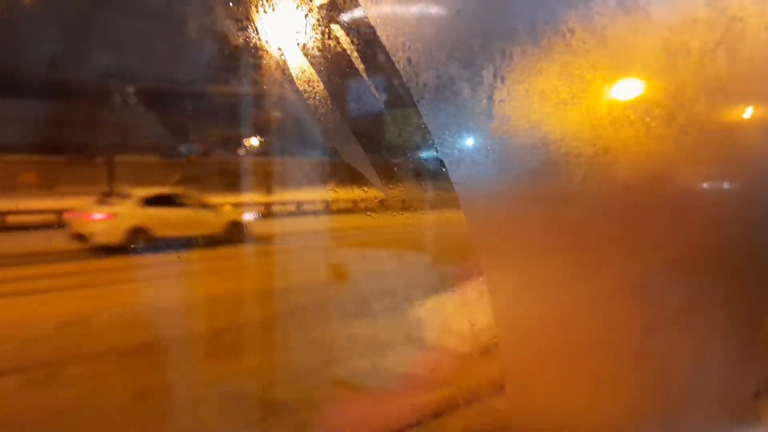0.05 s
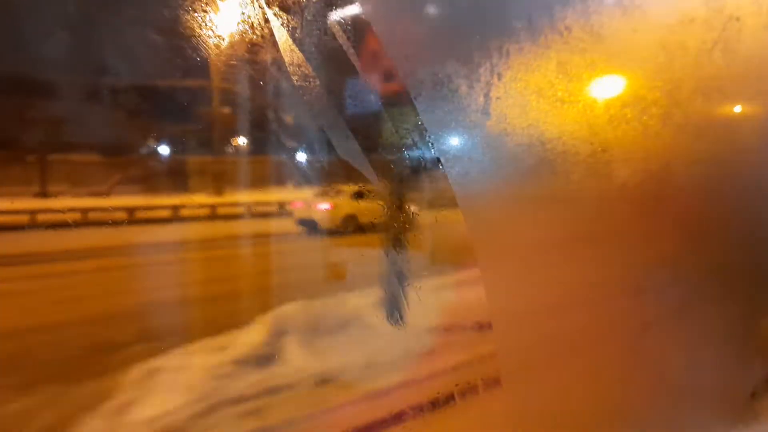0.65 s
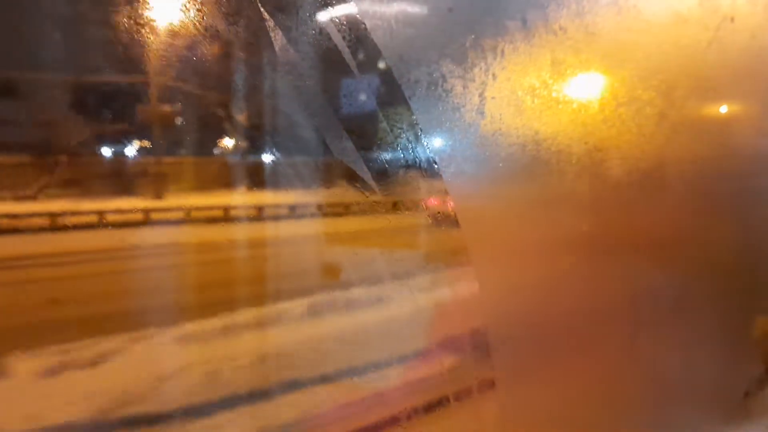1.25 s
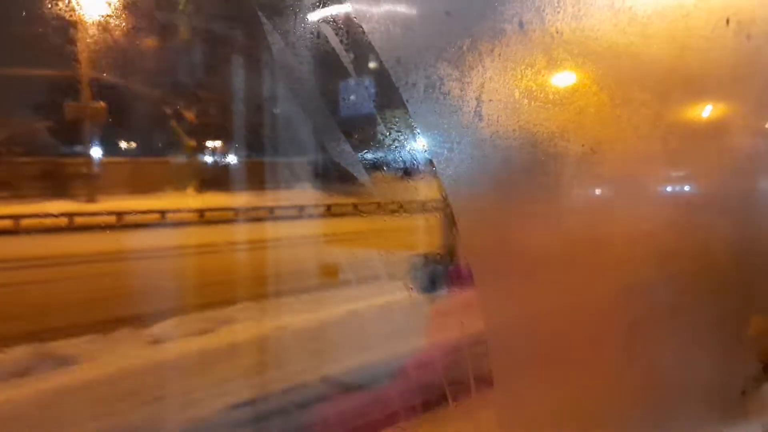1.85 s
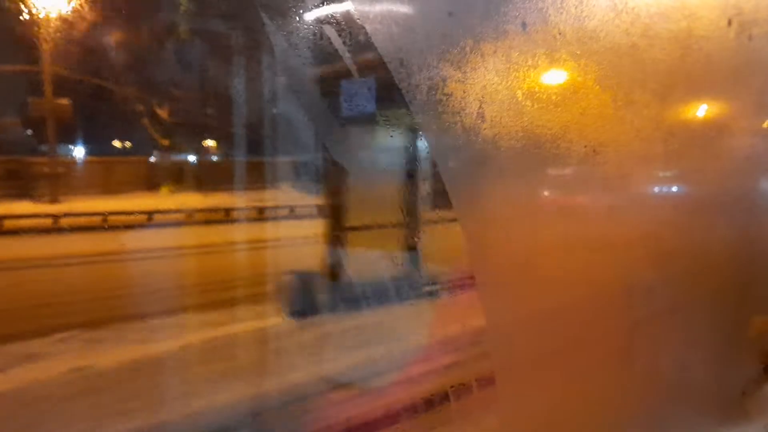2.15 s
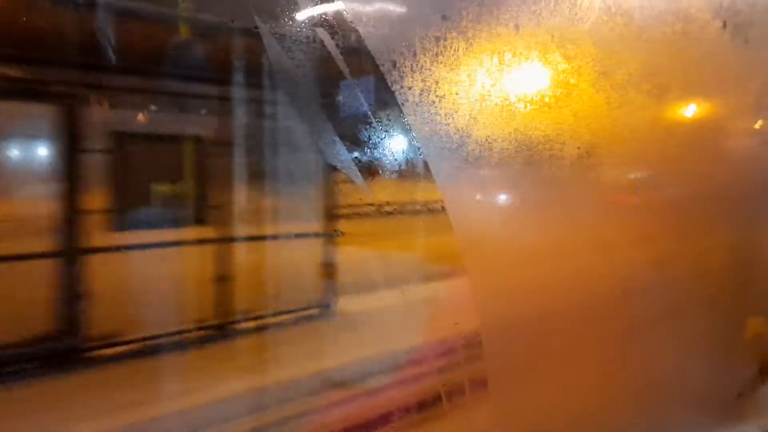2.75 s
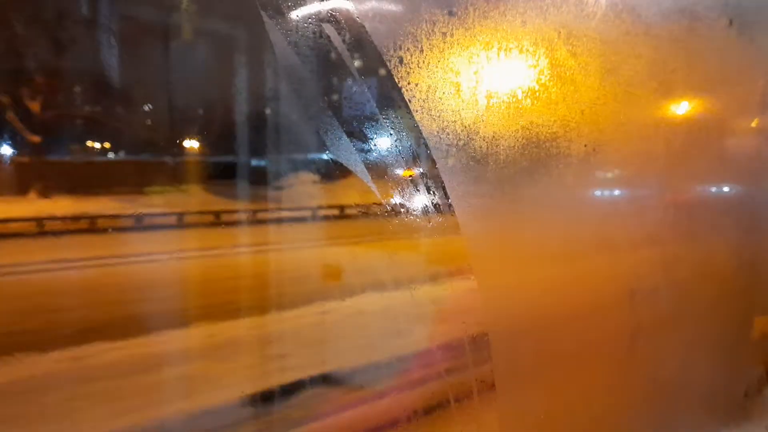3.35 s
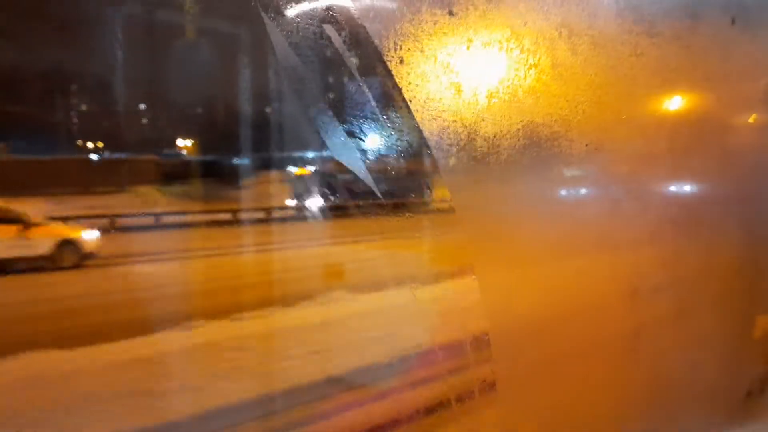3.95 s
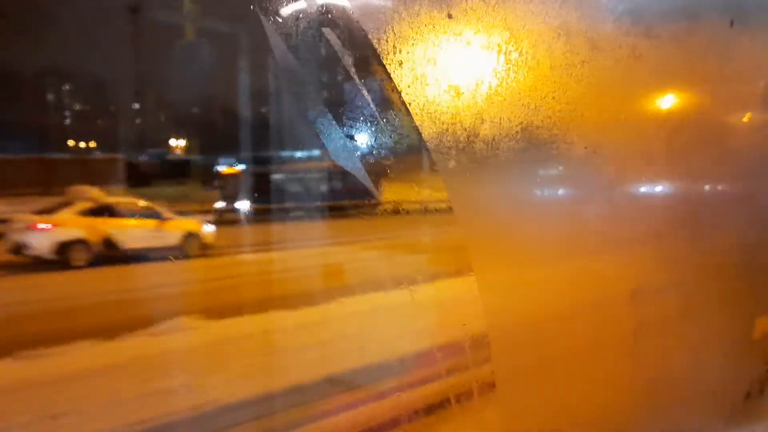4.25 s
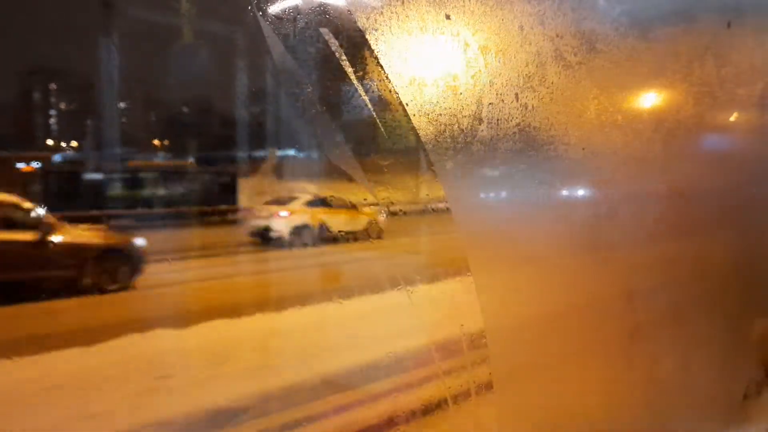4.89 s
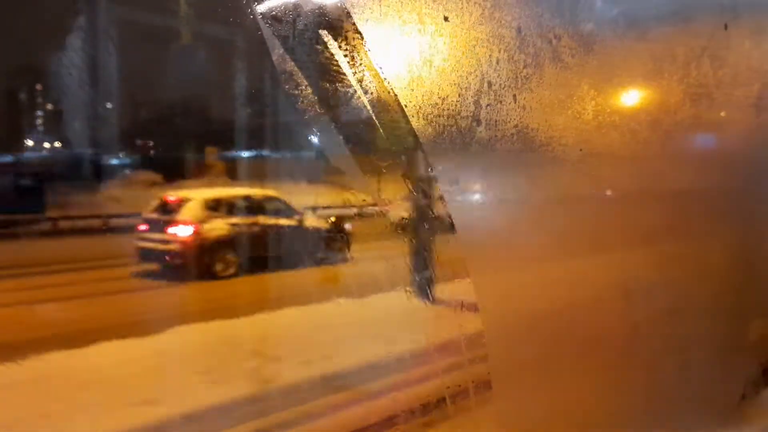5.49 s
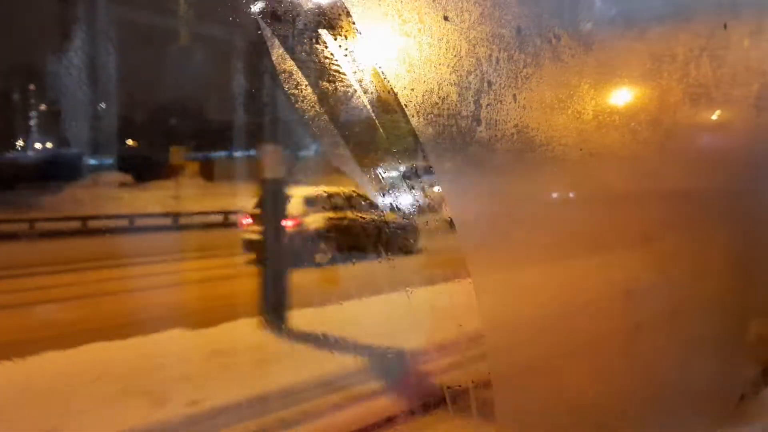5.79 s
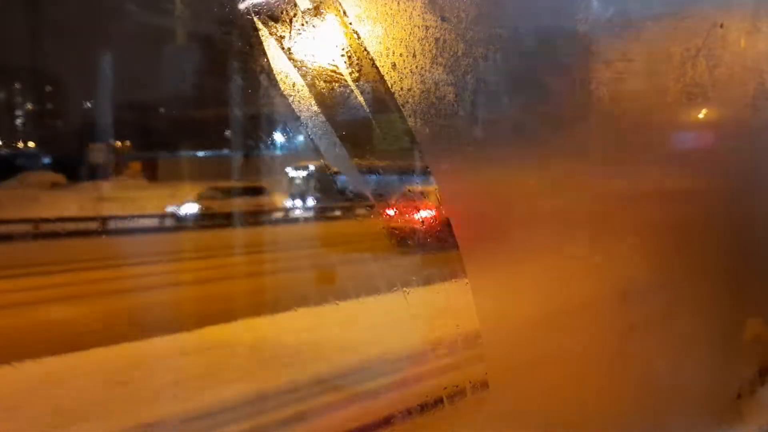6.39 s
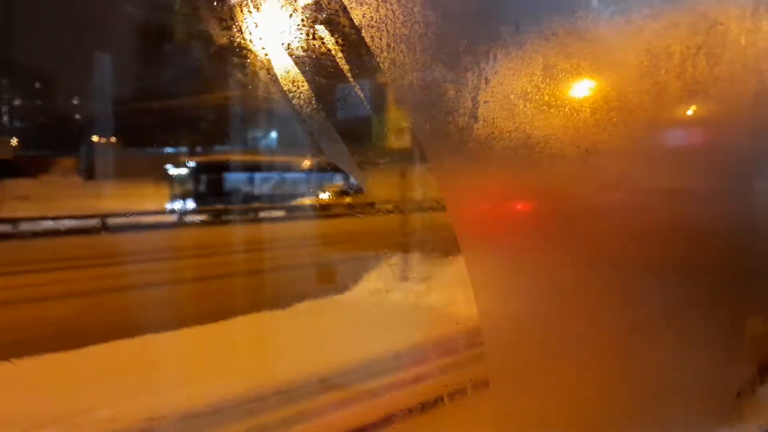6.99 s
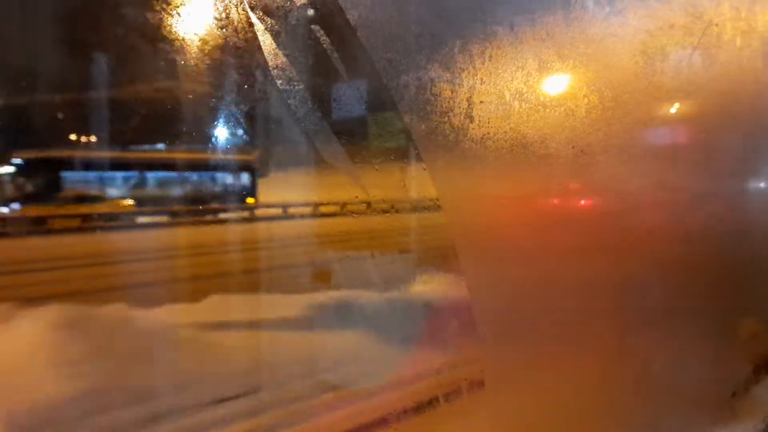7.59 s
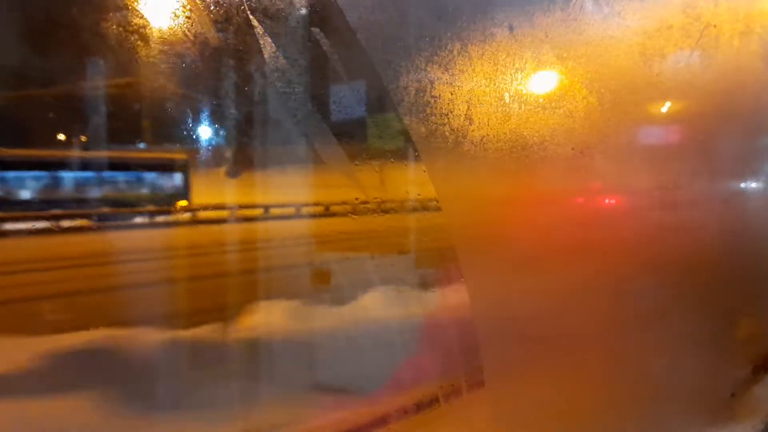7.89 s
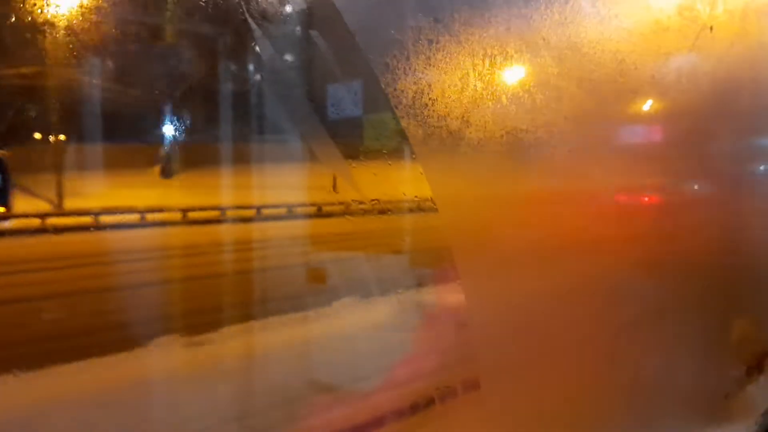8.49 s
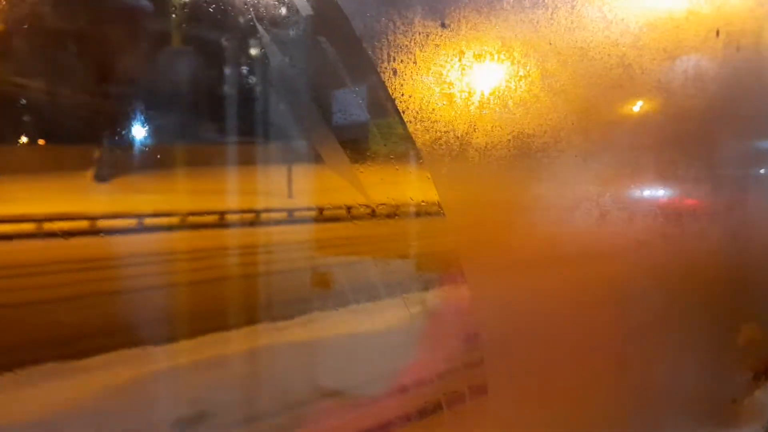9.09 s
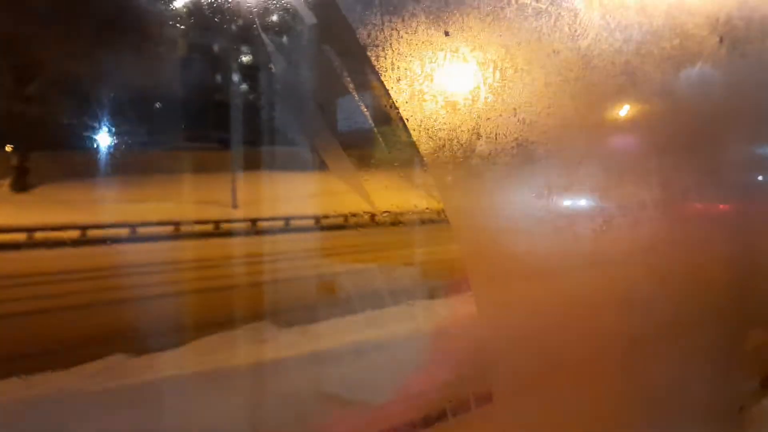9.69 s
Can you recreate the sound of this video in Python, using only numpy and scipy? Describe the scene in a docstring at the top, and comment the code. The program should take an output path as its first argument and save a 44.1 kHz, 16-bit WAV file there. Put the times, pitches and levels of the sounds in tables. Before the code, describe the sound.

Heard in stereo from a window seat inside a tram slowly gathering speed. A deep boom from the wheels throbs unevenly throughout, over the steady rumble and roar of rails coming through the floor. Loose trim ticks now and then and tiny fittings chatter lightly, with a few short rubs near the start and a soft brush of fabric later. A faint hiss and a thin, high electronic whine sit behind.

```python
"""Inside a tram on a snowy street, two microphones at a window seat, as it slowly gathers speed.
Ripples worn into two wheels make the car body boom near 82 Hz, and their tones beat in a steady throb.
Under it, rough rails rumble and roar up through the floor. Around the seat, loose trim ticks and
chatters among short rubs, chirps and one soft brush of fabric, over a faint hiss, a light rustle
and the thin whine of the traction electronics."""
import sys
import numpy as np
from scipy import signal
from scipy.fft import rfft, irfft, next_fast_len
from scipy.io import wavfile

SR = 44100
rng = np.random.default_rng(int(sys.argv[2]) if len(sys.argv) > 2 else 0)


def to_wav(s):
    """Save 16-bit WAV."""
    ch = np.atleast_2d(s).T  # columns
    pcm = np.round(np.clip(ch, -1, 1) * 32767)  # PCM
    wavfile.write(sys.argv[1], SR, pcm.astype(np.int16))


N = 429534
TIME = np.arange(N) / SR


def amp(db):
    """Decibels to gain."""
    return 10 ** (np.asarray(db) / 20)


def at_hz(points, hz):
    """Reads a spectrum on a log-frequency axis."""
    points_hz, values = np.transpose(points)
    return np.interp(np.log(hz + 1), np.log(points_hz + 1), values)


def curve(rows):
    """Reads a time table at every sample."""
    return np.interp(TIME, *np.transpose(rows))


def swing(rows):
    """How far a level curve stands above its own average, in dB."""
    level_db = curve(rows)
    return level_db - level_db.mean()


def drift(rate_hz, points=2048):
    """Slow random wandering of rms 1."""
    hz = np.fft.rfftfreq(points, TIME[-1] / points)
    slow = irfft(rfft(rng.standard_normal(points)) * np.exp(-(hz / rate_hz) ** 2))
    slow /= np.sqrt(np.mean(slow ** 2) + 1e-20)
    return np.interp(TIME, np.linspace(0, TIME[-1], points), slow)


def add(mix, start_s, sound):
    """Mixes a sound in at a time."""
    part = mix[:, max(round(start_s * SR), 0):][:, :sound.shape[1]]
    part += sound[:, :part.shape[1]]


# How alike the two microphones hear the cabin: frequency_hz, correlation
MIC_LIKENESS = [(40, .98), (85, .992), (135, .96), (250, .87), (400, .58), (650, .5), (1000, .05),
                (2000, .05), (8000, 0)]
# Balance between the microphones: frequency_hz, left_minus_right_db
MIC_BALANCE = [(60, 1), (99, 3.5), (160, 2), (270, 5), (450, 5.5), (740, 4), (1220, 2.5), (2010, 2.5),
               (3330, 5), (5500, -0.5), (9080, 4), (15000, 1.5)]

def cabin_noise(colour, size=N):
    """Noise of a given colour at the two microphones: alike in the bass, diffuse in the treble."""
    length = next_fast_len(size, True)
    hz = np.fft.rfftfreq(length, 1 / SR)
    left, other = rfft(rng.standard_normal((2, length)))
    likeness, lean_db = np.clip(at_hz(MIC_LIKENESS, hz), -1, 1), at_hz(MIC_BALANCE, hz)
    right = likeness * left + np.sqrt(1 - likeness ** 2) * other
    spectra = np.array([left * amp(lean_db / 2), right * amp(-lean_db / 2)])
    pair = irfft(spectra * amp(colour(hz)), length)[:, :size]
    return pair / pair.mean(0).std()


def bed(spectrum, level_db, flutter_db, flutter_hz):
    """Continuous noise that flutters about its level and falls 60 dB an octave above its last point."""
    top_hz = spectrum[-1][0]
    noise = cabin_noise(lambda hz: at_hz(spectrum, hz) - 60 * np.log2(np.maximum(hz / top_hz, 1)))
    return noise * amp(level_db + flutter_db * drift(flutter_hz))


def traction_whine(pitch_hz=9430, level_db=-87.5):
    """The traction electronics give off one thin, wavering tone."""
    return np.sqrt(2) * amp(level_db + 2.3 * drift(3)) * np.sin(2 * np.pi * pitch_hz * TIME + drift(6))


# Slow swell of the treble at the seat: time_s, relative_db
TREBLE_SWELL = [(0.0, -58), (1.27, -62), (2.79, -59), (3.99, -58), (5.67, -61), (6.94, -60.5), (7.3, -62),
                (9.74, -59)]
# Colours of the cabin's hiss and of the higher rustle: frequency_hz, relative_density_db
HISS_COLOUR = [(2710, -22.5), (4600, -3.5), (5190, -1.5), (5900, 0), (7170, -2.5), (8060, 1), (8460, 0),
               (9600, -14), (12500, -42), (21100, -120)]
RUSTLE_COLOUR = [(5650, -34), (9600, -5.5), (11600, 0.5), (15100, -5), (15800, -7)]

def cabin_air(hiss_db=-61, rustle_db=-67.4):
    """A faint hiss and a light rustle swell together all around the microphones."""
    swell_db = swing(TREBLE_SWELL)
    hiss = bed(HISS_COLOUR, hiss_db + .9 * swell_db, flutter_db=1.2, flutter_hz=18)
    rustle = bed(RUSTLE_COLOUR, rustle_db + 1.05 * swell_db, flutter_db=1.4, flutter_hz=12)
    return hiss + rustle


def fittings_chatter(per_s=60, base_db=-61, spread_db=2.5, ring_t60_s=.036):
    """Many tiny fittings jiggle, each touch ringing briefly at its own pitch."""
    out, t = np.zeros((2, N)), np.arange(SR // 20) / SR
    for when, pitch, softness, left_phase, right_phase in rng.random((round(per_s * N / SR), 5)):
        hz = 1400 * 3.2 ** pitch
        cycles = hz * t + np.array([[left_phase], [right_phase]])
        ring = np.sin(2 * np.pi * cycles) * amp(-60 * t / ring_t60_s)
        # larger parts ring lower and louder
        level_db = base_db - spread_db * np.log(softness + .02) + 9 * (1 - pitch)
        add(out, when * TIME[-1], ring * amp(level_db))
    return out


# Short rubs and chirps around the seat, and one soft, high rustle of fabric near the microphones:
# peak_s, level_db, length_s, centre_hz, width_octaves
SEAT_RUBS = [(0.263, -49, .066, 2000, .45), (0.378, -45.5, 0.043, 2000, 0.25),
             (0.477, -47, 0.064, 2150, 0.24), (.579, -58, .016, 4300, .03), (1.757, -59, .1, 8000, 0.11),
             (2.922, -53, 0.023, 1990, 0.065), (6.755, -51, 0.065, 2190, .4), (6.84, -58, .016, 4250, .03),
             (7.02, -60.5, 0.19, 13000, .3), (7.462, -56.5, .025, 4200, .03),
             (8.27, -58, 0.097, 5900, 0.12), (9.707, -54.5, .07, 6460, 0.32)]

def rubs_and_chirps():
    """Each rub, chirp or brush of fabric is a short swell of noise in one band."""
    out, t = np.zeros((2, N)), np.arange(-SR // 8, SR // 8) / SR
    for peak_s, level_db, length_s, centre_hz, width_octaves in SEAT_RUBS:
        def band_db(hz):
            return -10 * np.log10(1 + abs(np.log2((hz + 1) / centre_hz) / width_octaves) ** 3)
        swell = np.exp(-(2 * t / length_s) ** 2)
        add(out, peak_s + t[0], cabin_noise(band_db, len(t)) * amp(level_db) * swell)
    return out


# Ticks of loose trim around the seat: start_s, level_db, ring_t60_s, treble_tilt_db_per_octave
TRIM_TICKS = [(0.648, -47, .025, -1), (1.6715, -53.5, .16, -1), (2.2274, -53, .1, 8),
              (2.2515, -40.5, 0.12, -0.5), (2.36, -49.5, 0.15, 5), (3.4247, -53, 0.11, 7),
              (3.958, -48, 0.26, 0), (6.776, -44.5, .045, -21), (7.755, -53.5, .18, 1),
              (9.5812, -53, .04, 12)]
# Colour of a tick before its tilt: frequency_hz, relative_density_db
TRIM_COLOUR = [(700, -8), (1600, -3), (3200, 2), (5200, -5.5), (6500, 0.5), (8400, 2.5), (9600, -12.5),
               (12500, -3), (15500, -9)]

def trim_ticks(snap_db=5, snap_t60_s=.027, cabin_db=-13, cabin_t60_s=.25):
    """Loose trim ticks: a hard snap, a short ring and the tail of the cabin."""
    out, t = np.zeros((2, N)), np.arange(SR // 4) / SR
    for start_s, level_db, ring_t60_s, tilt in TRIM_TICKS:
        def colour_db(hz):
            return at_hz(TRIM_COLOUR, hz) + tilt * np.log2(np.maximum(hz, 2500) / 8000)
        stages_db = [snap_db - 60 * t / snap_t60_s, -60 * t / ring_t60_s, cabin_db - 60 * t / cabin_t60_s]
        decay = np.linalg.norm(amp(stages_db), axis=0)  # the three stages add in power
        add(out, start_s, cabin_noise(colour_db, len(t)) * amp(level_db) * decay)
    return out


# The tram gathers speed in two pulls: time_s, wheel_turns_per_s
WHEEL_SPEED = [(0, 3.206), (.85, 3.431), (1.8, 3.563), (4.3, 3.711), (5.3, 3.804), (7.6, 4.256),
               (8.6, 4.42), (9.74, 4.48)]
# Roughness of the rails passing under the floor: time_s, relative_db
RAIL_ROUGHNESS = [(0.0, -31.5), (0.5, -30.5), (1.1, -32), (1.6, -32), (2.3, -33), (5.3, -33.5), (6.6, -33),
                  (8.6, -32), (9.74, -34)]
# Rail noise through floor and cabin air, low to high: frequency_hz, relative_density_db
RUMBLE_COLOUR = [(15, -43), (32, -22), (43, -24), (55, -15), (68, -8.5), (82, -3), (95, -1), (108, -11),
                 (120, -12.5), (135, -6), (155, -18.5), (175, -12.5), (230, -26), (290, -45)]
ROAR_COLOUR = [(140, -34), (230, -7.5), (269, -0.5), (307, 0.5), (345, -4.5), (404, -5.5), (553, -16.5),
               (626, -15), (1100, -27.5), (1430, -55.5), (2420, -120)]
ROLLING_COLOUR = [(650, -31.5), (1100, -2.5), (1460, 0.5), (1770, -5), (2530, -2.5), (3230, -10),
                  (4600, -14.5), (5980, -46.5), (10100, -120)]

def rails(cruise_turns_per_s=3.8):
    """Steel on steel, louder on rough rail; the roar and brighter rolling noise also grow with speed."""
    rough_db = swing(RAIL_ROUGHNESS)
    speed_doublings = np.log2(curve(WHEEL_SPEED) / cruise_turns_per_s)
    rumble_db = -22.5 + 1.53 * rough_db
    roar_db = -33.5 + .9 * rough_db + 3 * speed_doublings
    rolling_db = -51.5 + .45 * rough_db + 4.5 * speed_doublings + .4 * swing(TREBLE_SWELL)
    rumble = bed(RUMBLE_COLOUR, rumble_db, flutter_db=1, flutter_hz=3.2)
    roar = bed(ROAR_COLOUR, roar_db, flutter_db=1.36, flutter_hz=10)
    rolling = bed(ROLLING_COLOUR, rolling_db, flutter_db=1.1, flutter_hz=14)
    return rumble + roar + rolling


# How the car body answers the wheels, heard from inside: frequency_hz, gain_db
BODY_RESPONSE = [(45, -24.5), (60, -17), (70, -10), (76, -4), (82, 1), (89, -5), (95, -6.5), (105, -20),
                 (125, -16)]

def tread_ripple(waves, level_db, phase_cycles, waver_db, creep_rad, phase_at_s=.129):
    """One wave pattern on a tread shakes the body at waves x wheel speed; creep on the rail smears it."""
    hz = waves * curve(WHEEL_SPEED)
    cycles = np.cumsum(hz) / SR
    cycles -= np.interp(phase_at_s, TIME, cycles)
    angle = 2 * np.pi * (cycles + phase_cycles) + creep_rad * drift(2.1)
    boom_db = level_db + at_hz(BODY_RESPONSE, hz) + waver_db * drift(1.6)
    return np.sqrt(2) * amp(boom_db) * np.cos(angle)


# The deep ripple of each wheel, the second wheel a little smaller: waves_per_turn, relative_speed
DEEP_WEAR = [(22, 1), (20, 1.0032)]
# The shallow ripples: waves_per_turn
SHALLOW_WEAR = [16, 17, 18, 19, 21, 23, 24, 25, 45, 47]
# How hard each deep and each shallow ripple drives the body: level_db
DEEP_DRIVE = [-17, -18]
SHALLOW_DRIVE = [-29, -25, -33, -27.5, -25.5, -25.5, -26, -29, -28, -25.5]
# How hard the wheels press into the body's boom: time_s, gain_db
WHEEL_LOAD = [(0, 1.5), (2, 1.5), (2.7, -1.5), (4.5, 0.2), (5.2, -4), (6.8, 2), (7.4, -2), (8.1, 3),
              (8.9, -6), (9.4, 2.5), (9.74, -2)]

def wheels():
    """Under the floor, two deep ripples beat about twice a turn; shallow ones make the throb uneven."""
    deep = sum(tread_ripple(waves * speed, level_db, 0, waver_db=1.2, creep_rad=.19)
               for (waves, speed), level_db in zip(DEEP_WEAR, DEEP_DRIVE))
    shallow = sum(tread_ripple(waves, level_db, rng.random(), waver_db=3, creep_rad=.44)
                  for waves, level_db in zip(SHALLOW_WEAR, SHALLOW_DRIVE))
    mic_gains = amp([[.95], [-1.05]])  # 2 dB louder at the left microphone
    return (deep + shallow) * amp(curve(WHEEL_LOAD)) * mic_gains


def scene():
    """Everything that reaches the window seat."""
    running = wheels() + rails() + cabin_air() + traction_whine()
    return running + trim_ticks() + rubs_and_chirps() + fittings_chatter()


def record(dry):
    """The recorder passes sound up to 15850 Hz, with soft ends."""
    fades = signal.windows.tukey(N, .002)
    lowpass = signal.firwin(511, 15850, window=("kaiser", 9), fs=SR)
    return signal.oaconvolve(dry * fades, lowpass[None], "same")


dry = scene()
out = record(dry)
to_wav(out)
```